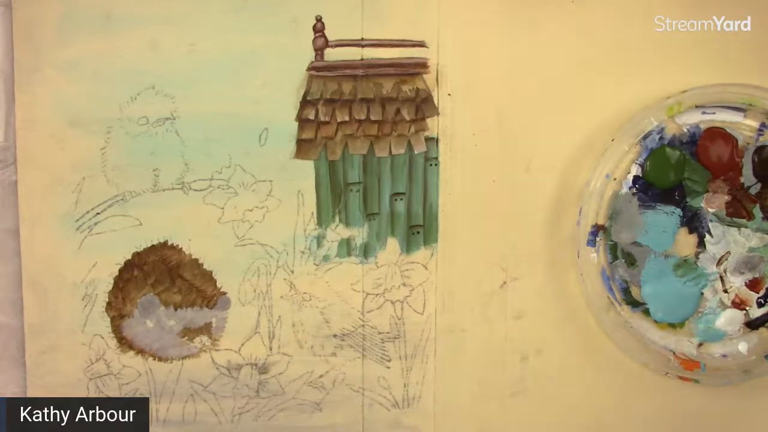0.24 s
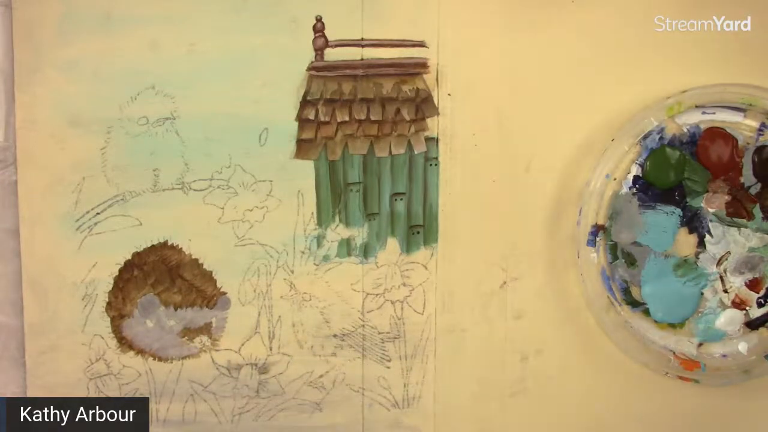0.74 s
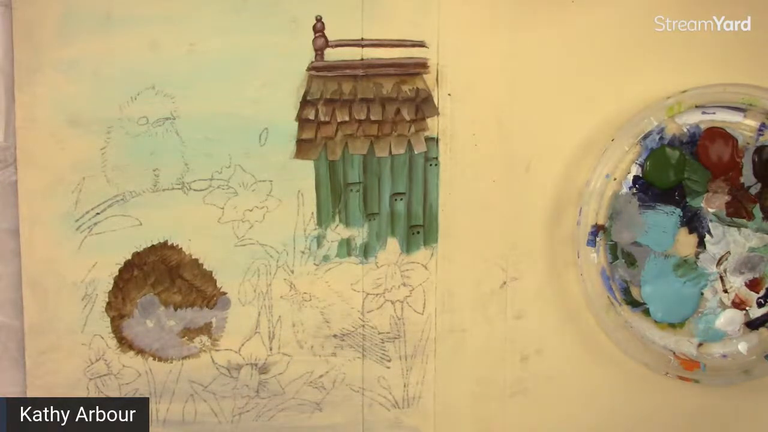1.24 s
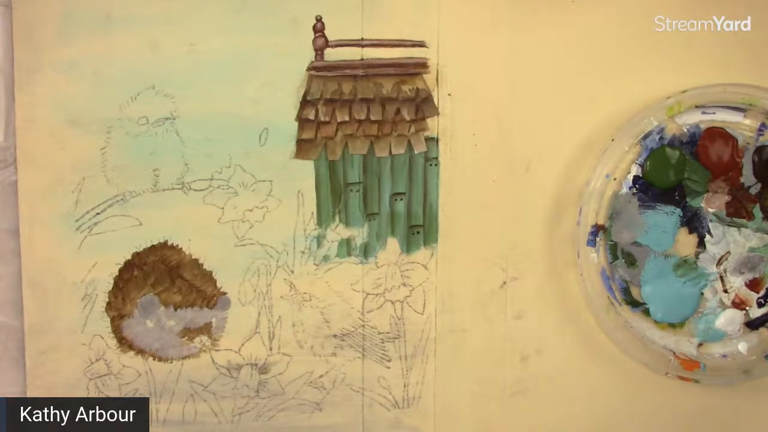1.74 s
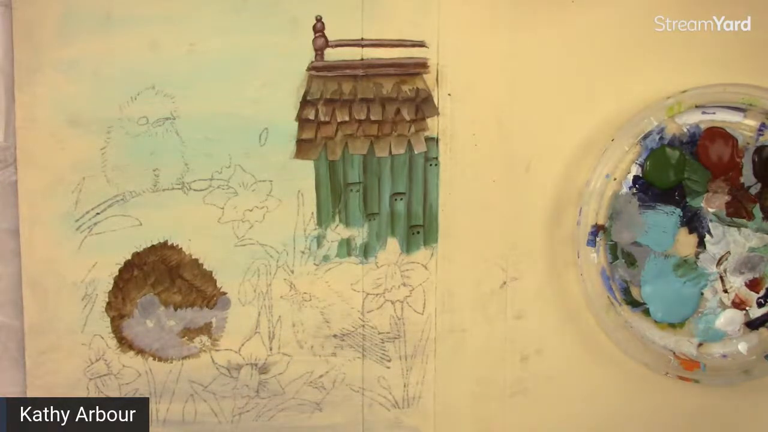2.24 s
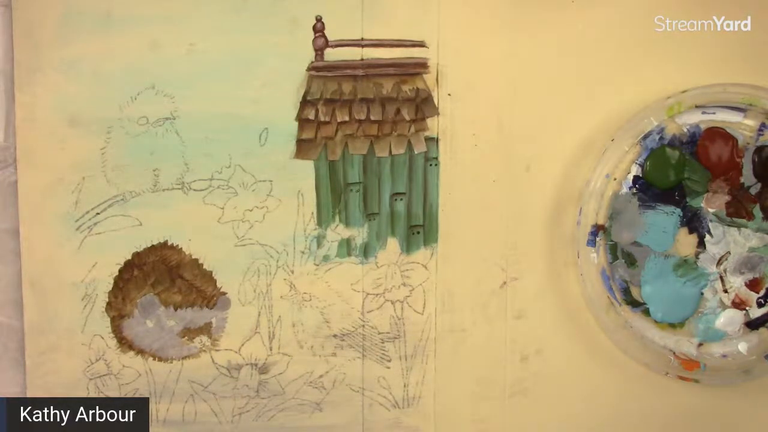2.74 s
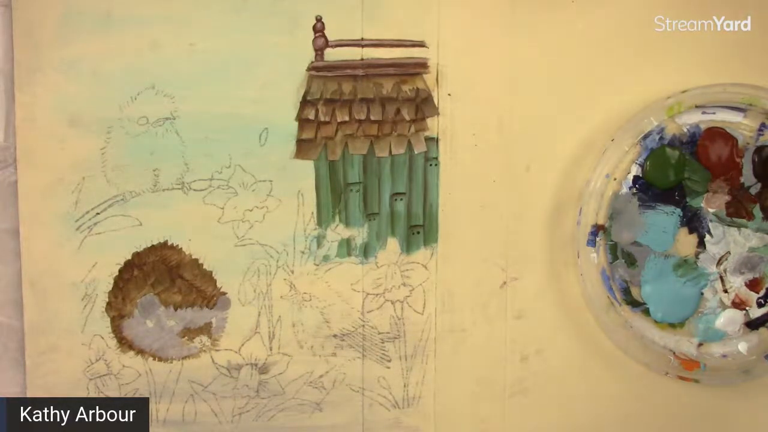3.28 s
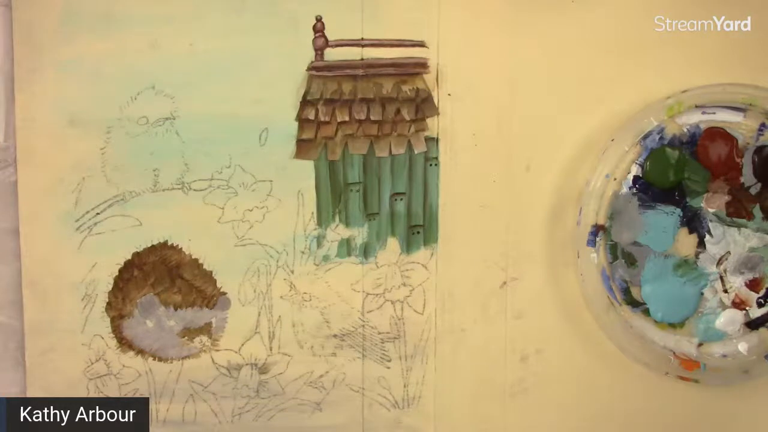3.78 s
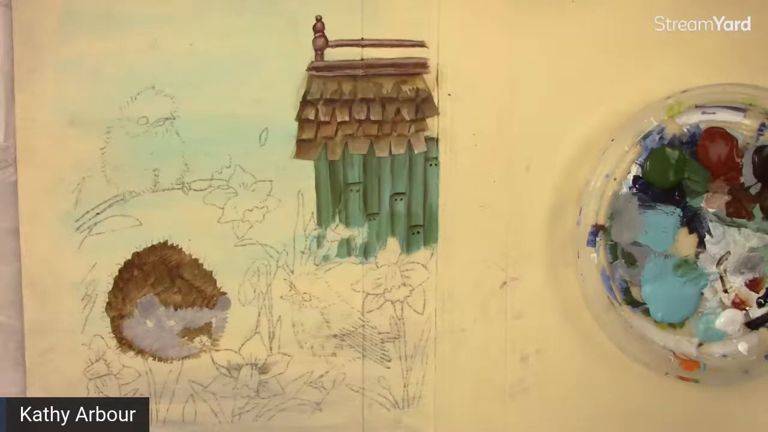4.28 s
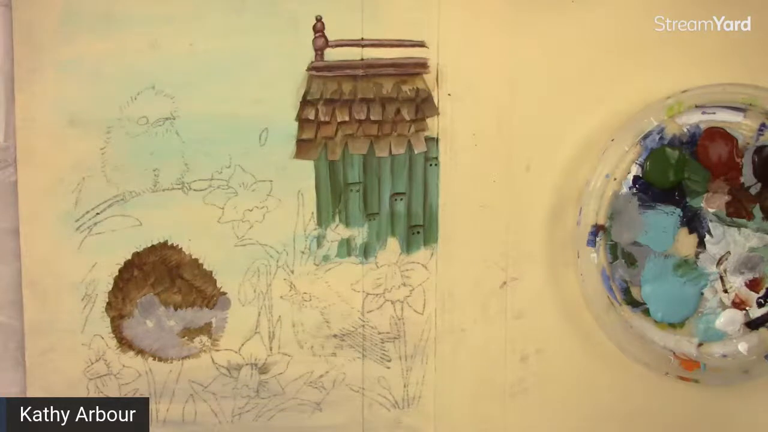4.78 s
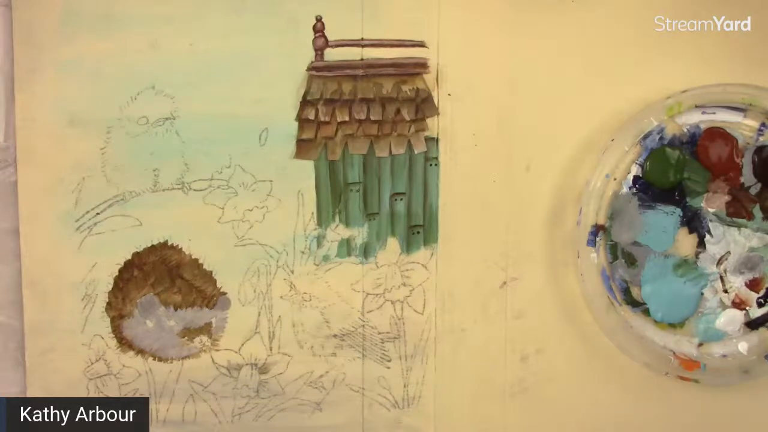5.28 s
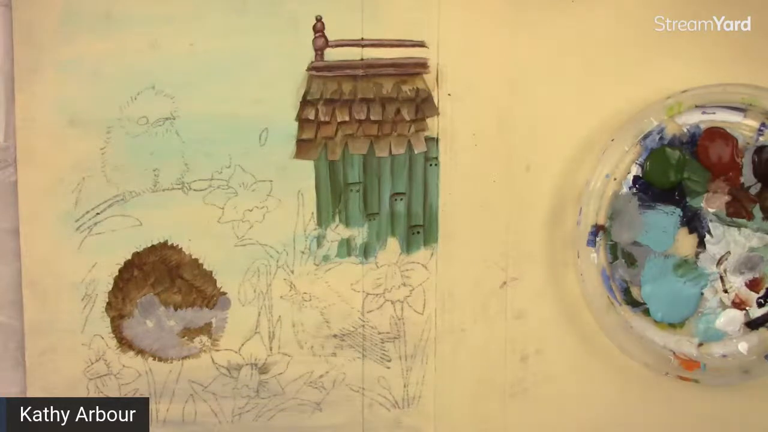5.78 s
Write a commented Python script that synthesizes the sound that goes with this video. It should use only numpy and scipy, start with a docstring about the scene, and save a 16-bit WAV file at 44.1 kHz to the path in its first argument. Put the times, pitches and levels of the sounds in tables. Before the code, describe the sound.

A paintbrush swishes rapidly back and forth in a glass jar of water, knocking the sides with gurgling, frothy splashes in a quiet room.

```python
"""A paintbrush swishes to and fro in a glass jar of water, eight or nine strokes a second.
Strokes push bubbling, frothing surges (shaped noise and bubble sines) and knock on the damped glass (struck modes):
deep ones gurgle and thud, shallow ones spray and clack. The jar rings on; large bubbles sing.
First the bare handle hisses, clicks and rubs; a small room adds a short tail, faint air and a low hum."""
import sys
import numpy as np
from scipy import signal
from scipy.fft import rfft, irfft, next_fast_len
from scipy.io import wavfile
from scipy.ndimage import uniform_filter1d, minimum_filter1d

SR = 44100
rng = np.random.default_rng(int(sys.argv[2]) if len(sys.argv) > 2 else 0)


def materialize(psi):
    """Save the field psi as 16-bit PCM at rate SR to the path in sys.argv[1].

    A 1-D psi becomes a single channel; in a 2-D psi each row is a channel.
    """
    bounded = np.clip(np.atleast_2d(psi).T, -1, 1)
    quanta = np.round(bounded * 32767).astype(np.int16)
    wavfile.write(sys.argv[1], SR, quanta)


N = 265482
TIME = np.arange(N) / SR  # s

# colour of the room's steady air: (frequency [Hz], level [dB])
AIR_COLOUR = [(80, -35), (130, -15.5), (430, -5.5), (650, -11), (1000, -13), (1550, -12), (3000, -22.5),
              (10000, -30.5), (16000, -49.5)]
# colour of the handle's hiss along its rest: (frequency [Hz], level [dB])
SLIDE_COLOUR = [(300, -25), (3700, -5.5), (4400, -19), (5600, -7), (6600, -13.5), (15000, -26.5)]
# handle taps outside the jar:
# (time [s], clack level [dB], brightness: tick over clack and clack over thud [dB], favoured pitch [Hz])
TAPS = [(0.0269, -37, 19, 5700), (0.119, -44, -10, 1480), (0.159, -50.5, 2.5, 7050),
        (.172, -48.5, -1, 2900), (.529, -66, -10, 2980), (0.73, -47.5, -18, 710)]
# modes of the bare handle: (frequency [Hz], level [dB], t60 [s])
HANDLE_MODES = [(1473, 12.5, 0.014), (3780, -0.5, 0.022), (4890, -13.5, 0.038), (5600, -0.5, 0.0269),
                (6160, -11, 0.02)]
# colour of the contact noise: (frequency [Hz], level [dB])
CRACK_COLOUR = [(40, -29.5), (190, -15), (400, -4.5), (1000, -2), (3100, 10.5), (4400, -0.5), (7500, -18),
                (9500, -15), (12500, -29), (16000, -37)]
# thud, clack and tick registers: (low edge [Hz], high edge [Hz])
REGISTERS = [(20, 1300), (1300, 5000), (5000, 16000)]
# soft shifts on the table: (crest time [s], Gaussian width [s], level [dB])
SHIFTS = [(0.743, 0.019, -43.5), (0.784, 0.041, -56.5), (5.677, 0.014, -56.5)]
# colour of the rubbing: (frequency [Hz], level [dB])
SCUFF_COLOUR = [(60, -37.5), (250, -7.5), (600, 9), (1300, 1), (5000, -26), (14000, -55)]
# strokes that end on the glass:
# (knock time [s], knock level [dB], brush depth [0-1], water level [dB], favoured pitch [Hz])
STROKES = [(0.926, -21, 0.31, -67, 2600), (0.9487, -23, 0.9, -63, 1560), (0.973, -23.5, 0.37, -41, 3880),
           (1.0539, -20.5, 0.75, -51, 1610), (1.189, -28, 0.98, -50, 1330),
           (1.7417, -16, 0.79, -29.5, 1860), (1.8509, -22.5, 0.23, -38, 2410),
           (1.95, -16, 0.7, -27.5, 1620), (2.051, -18.5, 0.38, -43, 2400), (2.2606, -19, 0.23, -28, 2370),
           (2.3826, -11, 0.52, -24.5, 1650), (2.485, -20.5, 0.28, -40.5, 1590),
           (2.6015, -10, 0.5, -33, 1700), (2.7069, -14.5, 0.29, -33.5, 2760), (2.788, -24, 0.51, -56, 3900),
           (2.8278, -14, 0.48, -29.5, 1660), (2.923, -12.5, 0.23, -33.5, 2660),
           (3.135, -18.5, 0.4, -38.5, 1820), (3.3406, -16, 0.16, -28.5, 2000),
           (3.452, -11.5, 0.48, -27.5, 3070), (3.5569, -15.5, 0.3, -31, 2520),
           (3.6839, -12.5, 0.52, -33, 2880), (3.778, -17, 0.16, -35, 2550), (3.9165, -18, 0.62, -64, 2200),
           (4.0073, -13.5, 0.14, -36, 2900), (4.1294, -15.5, 0.6, -34.5, 2700),
           (4.2172, -13.5, 0.17, -33.5, 2630), (4.343, -12.5, 0.7, -37, 1810),
           (4.4415, -13.5, 0.1, -43, 2200), (4.515, -20, 0.74, -46.5, 1650),
           (4.5474, -14.5, 0.5, -27, 2220), (4.6418, -12, 0.1, -27, 2920),
           (4.7611, -13.5, 0.45, -29.5, 2560), (4.8603, -6.5, 0.27, -30, 2600),
           (5.1008, -14.5, 0.18, -47, 2630)]
# sweeps without a knock: (crest time [s], water level [dB], brush depth [0-1], extra spray [dB])
SWEEPS = [(1.038, -36, 1, 1), (1.084, -33.5, 1, -1), (1.236, -35.5, 1, -5), (1.298, -28.5, 0.73, -11),
          (1.383, -30.5, 0.35, -22), (1.418, -29, 0.23, 0.5), (1.533, -39.5, 0, 4),
          (1.607, -27.5, 0.43, -3.5), (1.797, -28, 0.6, 2.5), (2.151, -30.5, 0.58, 8.5),
          (3.02, -35.5, 0.07, -5), (3.241, -31.5, 0.04, 3.5), (3.887, -45.5, .02, 12),
          (4.316, -30, 0.6, -15), (4.954, -33.5, 0, -4)]
# sloshing that carries on between strokes: (time [s], level [dB])
STIR = [(0.95, -58), (1.12, -32), (1.64, -33.5), (1.81, -30), (2.35, -27), (3.11, -34.5), (4.68, -27),
        (4.96, -33), (5.12, -35)]
# colour of the churning water: (frequency [Hz], level [dB])
WATER_COLOUR = [(60, -43.5), (220, -18.5), (400, -5.5), (660, -3.5), (900, 8), (1350, -0.5), (1700, 1.5),
                (2750, 5), (4200, -0.5), (7500, -12), (9500, -10.5), (15000, -28.5)]
# gurgle, bubbling, splash and spray registers: (low edge [Hz], high edge [Hz])
WATER_REGISTERS = [(20, 620), (620, 1300), (1300, 5000), (5000, 16000)]
# modes of the water-filled jar with the brush against it: (frequency [Hz], level [dB], t60 [s])
JAR_MODES = [(416, -21.5, 0.039), (530, -4, 0.019), (806, -0.5, 0.028), (1099, 3.5, 0.039),
             (1578, 7.5, 0.023), (1747, -7.5, 0.033), (2400, 3, 0.034), (2576, 2.5, 0.014),
             (2833, 4.5, 0.01), (3470, 2, 0.019), (4180, -9, 0.024), (6846, -6.5, 0.0097)]
# large single bubbles: (crest time [s], pitch at the crest [Hz], peak level [dB])
BUBBLES = [(.931, 866, -12), (1.089, 470, -29), (1.231, 845, -24), (1.323, 2800, -19), (1.508, 2550, -26),
           (1.703, 802, -25), (1.797, 843, -19), (1.997, 840, -19), (2.031, 827, -22.5), (2.138, 1930, -23),
           (2.154, 1089, -14), (2.249, 860, -17.5), (2.359, 842, -16.5), (2.909, 840, -18.5),
           (3.438, 818, -13.5), (3.963, 2650, -23.5), (3.997, 1090, -22.5), (4.120, 1104, -20),
           (4.184, 830, -20), (4.313, 850, -21), (4.524, 830, -16), (4.852, 1056, -14.5),
           (5.077, 1045, -25)]
# resonances of the half-filled jar under every knock and splash: (frequency [Hz], level [dB], t60 [s])
CAVITY_MODES = [(833.6, -1.5, 0.072), (1111, -5.5, 0.12), (1693, -1, .05), (2760, -8, 0.011)]
# colour of the room's echo: (frequency [Hz], level [dB])
ECHO_COLOUR = [(60, -0.5), (450, 12.5), (1100, 2.5), (6000, -1.5), (15000, 5)]

TAP_THUD_DB = -4.5  # the light handle has little thud
# the place of a blow adds one resonance; below LOWEST_HZ the modes barely radiate
PLACE_DB, PLACE_Q, LOWEST_HZ = 5.5, 2.26, 271.7
# a blow also thumps the body of water; THUD_DB is the resonance added at full depth
THUD_HZ, THUD_DB, THUD_Q = 434, 14, 1.3
TOP_HZ = 15900
# thud, clack and tick against the knock level
SHALLOW_KNOCK_DB, DEEP_KNOCK_DB = (-13, 3.5, -14), (1.5, -15, -22.5)
# gurgle, bubbling, splash and spray against the water level
SHALLOW_WATER_DB, DEEP_WATER_DB = (-27.5, -5.5, 1.5, -11.5), (-2.5, 0.5, -6, -16)
# the bow wave leads the knock, by more when deep
LEAD_S, DEEP_LEAD_S = 0.0082, 0.05
# the wake closes in after it; dB of the four water registers against the bow wave
WAKE_DELAY_S, WAKE_S, WAKE_DB = 0.038, 0.024, (-4, -12.5, -8.5, -16.5)
SWEEP_S = 0.021  # a free sweep holds its crest
FROTH_FLARE_DB, FROTH_RATE_HZ = 10, 100  # swing up and down, changes per second
SLOSH_BEND, SLOSH_RATE_HZ = 0.022, 12  # jar pitch: rms bend at each knot [share], knots per second


def undb(db):
    """Decibels to gain."""
    return 10 ** (np.asarray(db) / 20)


def unit(x):
    """Scale to rms 1."""
    return x / np.sqrt(np.mean(x ** 2))


def fade(t, t60):
    """Exponential decay of 60 dB in t60 seconds."""
    return np.exp(-np.log(1000) * t / t60)


def add(out, start_s, x):
    """Mix x into out from start_s."""
    i = max(int(start_s * SR), 0)
    out[i:i + len(x)] += x[:max(N - i, 0)]


def band(x, edges_hz):
    """Causal band-pass."""
    return signal.sosfilt(signal.butter(4, edges_hz, "band", fs=SR, output="sos"), x)


def peak(x, hz, q):
    """One resonance, gain 1 at its centre."""
    return signal.lfilter(*signal.iirpeak(hz, q, fs=SR), x)


def colour(x, points):
    """Filter x by (frequency [Hz], level [dB]) points, joined over log frequency."""
    hz, db = np.transpose(points)
    size = next_fast_len(len(x))
    f = np.maximum(np.arange(size // 2 + 1) * SR / size, 1)
    gain = undb(np.interp(np.log(f), np.log(hz), db))
    return irfft(rfft(x, size) * gain, size)[:len(x)]


def by_depth(depth, shallow_db, deep_db):
    """Register levels, blended from shallow (0) to deep (1)."""
    return (1 - depth) * np.array(shallow_db) + depth * np.array(deep_db)


def background(air_db, waver_db, hum_hz, hum_db):
    """Faint room air, its level redrawn ten times a second, and a steady low hum."""
    waver = np.interp(TIME, np.arange(70) / 10, rng.standard_normal(70))
    air = undb(air_db + waver_db * waver) * unit(colour(rng.standard_normal(N), AIR_COLOUR))
    hum = undb(hum_db) * np.sin(2 * np.pi * hum_hz * TIME)
    return air + hum


def slide(start_s, hiss_db, t60):
    """The handle slides off its rest with a thin, fading hiss."""
    hiss = unit(colour(rng.standard_normal(N), SLIDE_COLOUR))
    return undb(hiss_db) * (TIME > start_s) * fade(TIME, t60) * hiss


def handle_blows():
    """Brighter taps tilt to the treble: (time [s], pitch [Hz], depth, thud, clack, tick [dB])."""
    return [(s, hz, 0, db - bright_db + TAP_THUD_DB, db, db + bright_db)
            for s, db, bright_db, hz in TAPS]


def strikes(rows, modes, crack_db, crack_t60, scatter_db, detune, contact_s, slide_s):
    """Blows ring the modes over a short crack; place, depth and register levels colour each blow."""
    out = np.zeros(N)
    t = np.arange(-SR // 50, SR // 8) / SR
    attack = (t > 0) & (t < .008)
    after = np.maximum(t, 0)
    hz, db, t60 = np.transpose(modes)[:, :, None]
    # each mode builds up over the contact and half a cycle
    buildup = 1 - np.exp(-(after / (contact_s + .5 / hz)) ** 2)
    envelope = buildup * fade(after, t60)
    # the brush scrapes for an instant before it lands
    contact = np.exp(np.minimum(t, 0) / slide_s) * fade(after, crack_t60)
    for s, place_hz, depth, *levels_db in rows:
        size, pitch, side = rng.standard_normal((3, len(modes), 1))
        gain = np.sign(side) * undb(db + scatter_db * size)
        sines = np.sin(2 * np.pi * hz * (1 + detune * pitch) * t)
        ring = band(np.sum(gain * envelope * sines, axis=0), (LOWEST_HZ, TOP_HZ))
        crack = colour(rng.standard_normal(len(t)) * contact, CRACK_COLOUR)
        blow = ring / ring[attack].std() + undb(crack_db) * crack / crack[attack].std()
        blow = blow + undb(PLACE_DB) * peak(blow, place_hz, PLACE_Q) \
            + depth * undb(THUD_DB) * peak(blow, THUD_HZ, THUD_Q)
        for edges_hz, level_db in zip(REGISTERS, levels_db):
            part = band(blow, edges_hz)
            add(out, s + t[0], part * undb(level_db) / part[attack].std())
    return out


def shifts():
    """Dull, brief rubbing on the table: noise in Gaussian swells."""
    swell = sum(undb(db) * np.exp(-.5 * ((TIME - s) / width_s) ** 2) for s, width_s, db in SHIFTS)
    return swell * unit(colour(rng.standard_normal(N), SCUFF_COLOUR))


def surges():
    """Bow wave and wake per stroke, one swell per sweep: (hold start [s], hold [s], register levels [dB])."""
    rows = []
    for s, db, depth, spray_db in SWEEPS:
        levels_db = db + by_depth(depth, SHALLOW_WATER_DB, DEEP_WATER_DB) + np.array([0, 0, 0, spray_db])
        rows.append((s - SWEEP_S / 2, SWEEP_S, levels_db))
    for s, _, depth, db, _ in STROKES:
        lead_s = LEAD_S + DEEP_LEAD_S * depth
        levels_db = db + by_depth(depth, SHALLOW_WATER_DB, DEEP_WATER_DB)
        rows.append((s - lead_s, lead_s, levels_db))
        rows.append((s + WAKE_DELAY_S, WAKE_S, levels_db + np.array(WAKE_DB)))
    return rows


def bubble_cloud(lo_hz, hi_hz, per_second, cycles, spread_db, glide):
    """Many small bubbles: damped sines whose pitch drifts as the current carries them."""
    out = np.zeros(N)
    for when, pitch, size, life, drift in rng.random((int(per_second * N / SR), 5)):
        hz = lo_hz * (hi_hz / lo_hz) ** pitch
        t60 = cycles * (.5 + life) / hz
        t = np.arange(int(t60 * SR)) / SR
        shape = (1 - np.exp(-hz * t / 2)) * fade(t, t60)  # pinches off over a couple of cycles
        bend = 1 + glide * (2 * drift - 1) * t / t60  # bends the phase; pitch moves twice as far
        gain = undb(spread_db * size) * hz ** .5
        add(out, when * N / SR, gain * shape * np.sin(2 * np.pi * hz * t * bend))
    return out


def froth(crackle_db):
    """Bursting foam: half-octave bands of fine crackle that flare up independently."""
    out = 0
    knots_s = np.arange(0, N / SR + 1, 1 / FROTH_RATE_HZ)
    for hz in 250 * 2 ** np.arange(0, 6, .5):
        crackle = rng.standard_normal(N) * undb(crackle_db * rng.standard_normal(N))
        swing = np.interp(TIME, knots_s, rng.uniform(-1, 1, len(knots_s)))
        out = out + undb(FROTH_FLARE_DB * swing) * unit(band(crackle, (hz, hz * 2 ** .5)))
    return out


def swish(rise_s, fall_s, froth_db, crackle_db, stir_db):
    """Each surge swells a dense bubble cloud and patchy froth; slower sloshing fills the gaps."""
    cloud = bubble_cloud(190, 3800, per_second=2400, cycles=40, spread_db=20, glide=.07)
    churn = colour(unit(cloud) + undb(froth_db) * unit(froth(crackle_db)), WATER_COLOUR)
    stir = undb(np.interp(TIME, *np.transpose(STIR), left=-np.inf, right=-np.inf))
    t = np.arange(-SR // 10, SR // 5) / SR
    out = 0
    for k, edges_hz in enumerate(WATER_REGISTERS):
        power = (stir * undb(stir_db[k])) ** 2
        for s, hold_s, levels_db in surges():
            slope = np.minimum(t, 0) / rise_s + np.maximum(t - hold_s, 0) / fall_s
            surge = 1 / np.cosh(slope) ** 2
            add(power, s + t[0], surge * undb(levels_db[k]) ** 2)
        out = out + np.sqrt(power) * unit(band(churn, edges_hz))
    return out


def wall_blows():
    """Knock colour follows depth: (time [s], pitch [Hz], depth, thud, clack, tick [dB])."""
    return [(s, hz, depth, *(db + by_depth(depth, SHALLOW_KNOCK_DB, DEEP_KNOCK_DB)))
            for s, db, depth, _, hz in STROKES]


def plops(swell_s, ring_s, glide_per_s):
    """Large air pockets close behind the brush and sing as rising sines."""
    out = np.zeros(N)
    t = np.arange(-SR // 20, SR // 20) / SR
    shape = np.where(t < 0, np.exp(-(t / swell_s) ** 2), 1 / np.cosh(t / ring_s))
    for s, hz, db in BUBBLES:
        cycles = hz * t * (1 + glide_per_s * t) + rng.random()  # pitch rises at twice glide_per_s
        add(out, s + t[0], undb(db) * shape * np.sin(2 * np.pi * cycles))
    return out


def cavity(x, gain_db):
    """The jar and its air column ring on after each sound, their pitch bending as the water sloshes."""
    t = np.arange(SR // 4) / SR
    rings = 0
    for hz, db, t60 in CAVITY_MODES:
        per_sample = 2 * np.log(1000) / (t60 * SR)  # makes db the gain at resonance
        rings = rings + undb(db) * per_sample * fade(t, t60) * np.cos(2 * np.pi * hz * t)
    slosh = np.interp(TIME * SLOSH_RATE_HZ, np.arange(200), rng.standard_normal(200))
    clock = np.cumsum(np.exp(SLOSH_BEND * slosh)) / SR  # runs fast while the pitch is high
    ringing = signal.fftconvolve(np.interp(TIME, clock, x), rings)[:N]
    return undb(gain_db) * (x + np.interp(clock, TIME, ringing))


def room(x, wet_db, t60s, delay_s):
    """Diffuse echo of a small room: decaying noise, each register with its own t60."""
    t = np.arange(SR // 2) / SR
    noise = colour(rng.standard_normal(len(t)), ECHO_COLOUR)
    tail = sum(band(noise, edges_hz) * fade(t, t60) for edges_hz, t60 in zip(REGISTERS, t60s))
    tail = tail * np.clip(t / delay_s - .5, 0, 1)  # onset ramp from 0.5 to 1.5 delays
    return undb(wet_db) * signal.fftconvolve(x, tail / np.sqrt(np.sum(tail ** 2)))[:N]


def scene():
    """Knocks and water sound inside the jar, the handling beside it, all in one room."""
    hiss = slide(start_s=0.009, hiss_db=-37.0, t60=0.4)
    taps = strikes(handle_blows(), HANDLE_MODES, crack_db=6.5, crack_t60=0.027, scatter_db=3,
                   detune=0.0055, contact_s=0.000076, slide_s=0.0015)
    beside = hiss + taps + shifts()
    water = swish(rise_s=0.0029, fall_s=0.0083, froth_db=-6.5, crackle_db=7,
                  stir_db=(-26, -15, -11, -33.5))
    knocks = strikes(wall_blows(), JAR_MODES, crack_db=-1, crack_t60=0.031, scatter_db=6,
                     detune=0.01704, contact_s=0.00014, slide_s=0.00024)
    singing = plops(swell_s=0.0036, ring_s=.005, glide_per_s=1.2)
    inside = cavity(knocks + water, gain_db=-1.0) + singing
    # the handling is nearer the microphone, so less of it is echo
    sent = inside + undb(-5) * beside
    echo = room(sent, wet_db=-11.5, t60s=(.28, .24, .26), delay_s=0.0021)
    air = background(air_db=-66.5, waver_db=1.0, hum_hz=118, hum_db=-79.5)
    return (inside + beside + echo + air)[None]


def record(dry):
    """A fast limiter holds the highest peaks down; a steep low-pass cuts the top."""
    headroom = minimum_filter1d(1 / np.maximum(np.abs(dry), 1), size=SR // 400)
    limited = dry * uniform_filter1d(headroom, size=SR // 400)
    return signal.sosfilt(signal.ellip(8, .2, 70, TOP_HZ, fs=SR, output="sos"), limited)


dry = scene()
out = record(dry)
materialize(out)
```